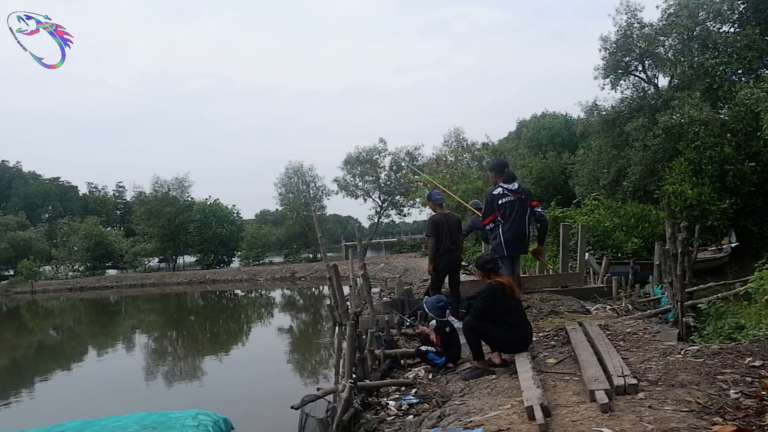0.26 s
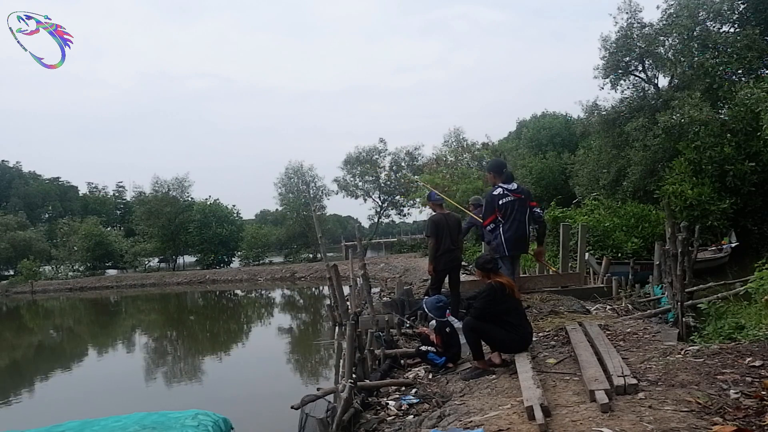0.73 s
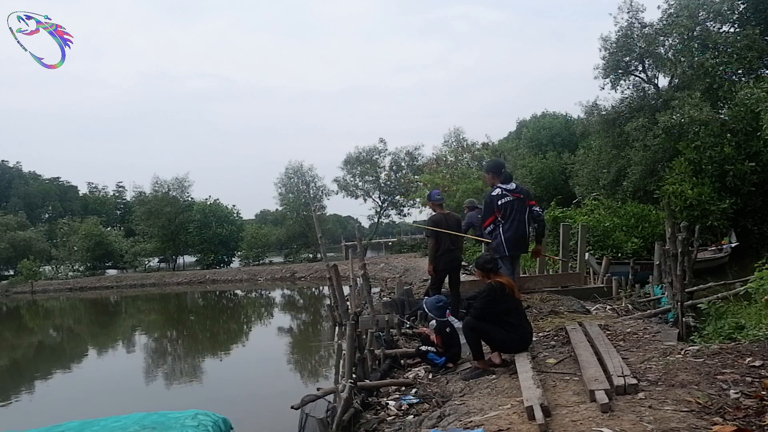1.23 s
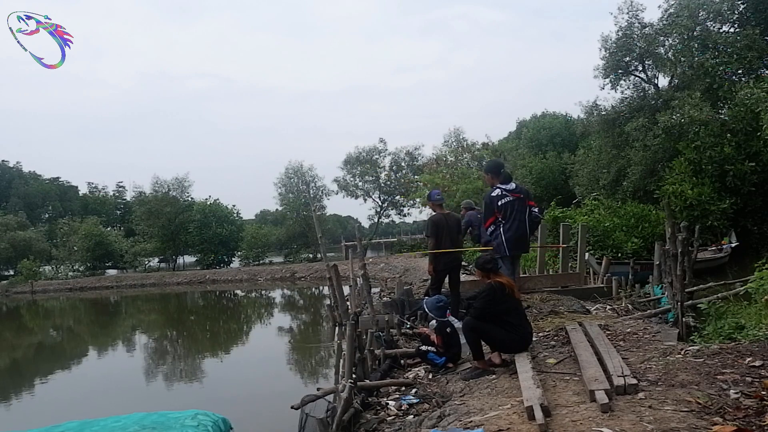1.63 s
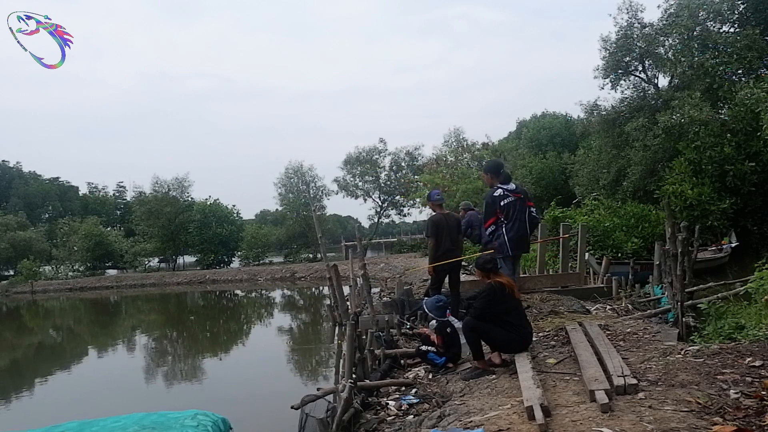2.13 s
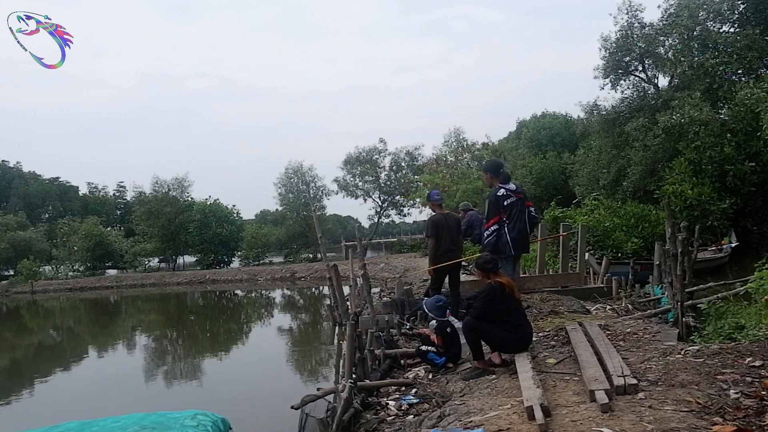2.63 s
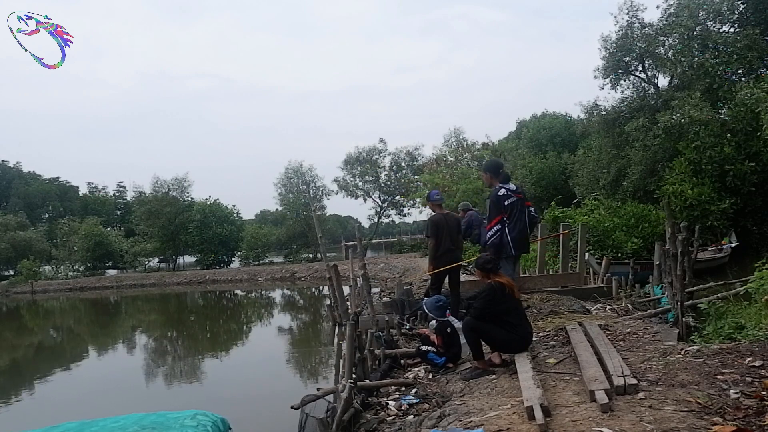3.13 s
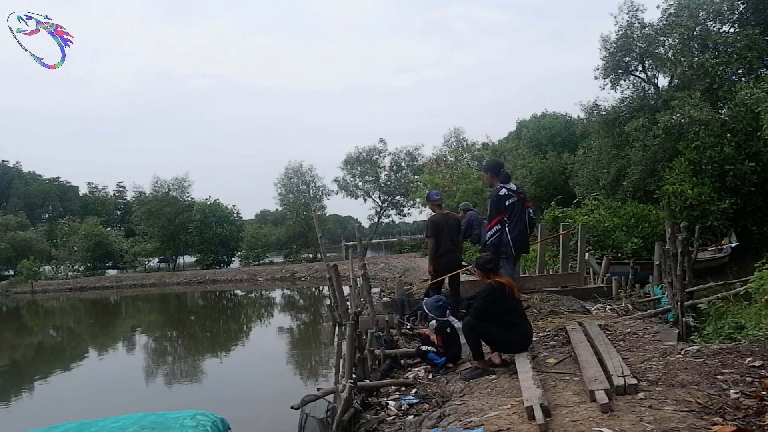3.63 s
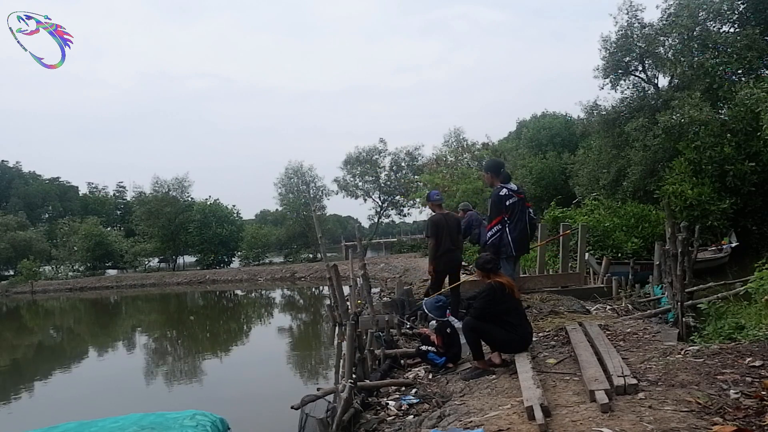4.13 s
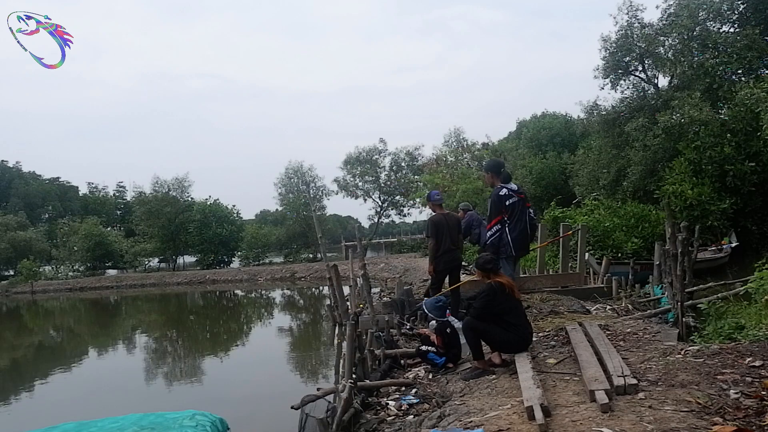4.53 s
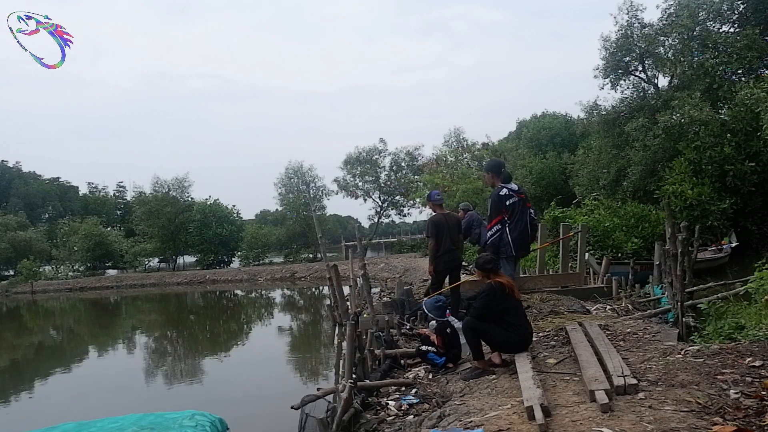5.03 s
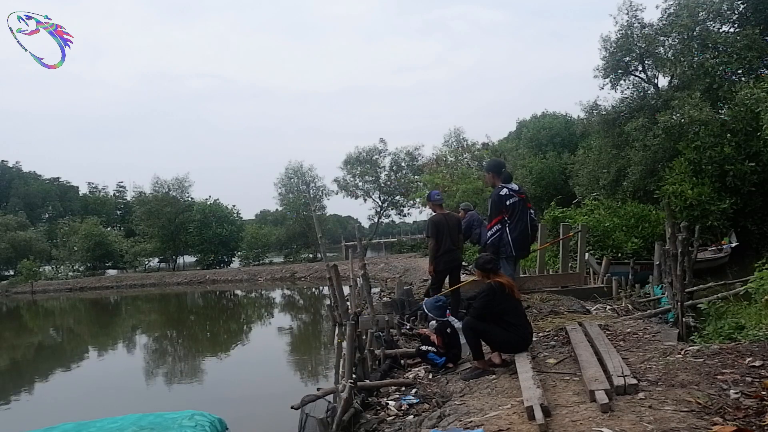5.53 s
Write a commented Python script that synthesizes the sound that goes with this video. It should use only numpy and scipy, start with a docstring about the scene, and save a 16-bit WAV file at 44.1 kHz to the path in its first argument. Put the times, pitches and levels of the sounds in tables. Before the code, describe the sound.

Outdoors by a tree-lined pond, gusts rumble and thump on an unprotected stereo microphone, strongest in the first two seconds and again around three. Two high crickets pulse in overlapping bouts toward the right. A small bird gives a quick falling chirp about every half second, over soft leaf hiss and a faint far engine. A few tiny twig ticks come early.

```python
"""A pond bank on a breezy day. Gusts rumble and thump on the microphone: turbulence noise and single pressure bumps.
Behind them lie the filtered-noise wash of open air and leaves and the steady harmonics of a far engine.
Two crickets sing in overlapping bouts of paired wing strokes; behind them noise bands rise with their bouts,
a chorus deep in the bushes and the blurred wash of the nearer cricket's strokes.
A small bird repeats one falling chirp, a swept tone which the trees scatter; twigs tick as short noise bursts."""
import sys
import numpy as np
from scipy import signal
from scipy.fft import rfft, irfft
from scipy.io import wavfile
from scipy.ndimage import uniform_filter1d

SR = 44100
rng = np.random.default_rng(int(sys.argv[2]) if len(sys.argv) > 2 else 0)


def inscribe(sig):
    """Save sig as 16-bit PCM at rate SR to the path in sys.argv[1].

    A 1-D sig is mono; a 2-D sig holds one channel per row.
    Samples are clipped to [-1, 1] before scaling.
    """
    pcm = np.round(np.clip(np.atleast_2d(sig).T, -1, 1) * 32767)
    wavfile.write(sys.argv[1], SR, pcm.astype(np.int16))


N = 254456
T = np.arange(N) / SR  # time of every sample, s


def gain_of(db):
    """Decibels to amplitude."""
    return 10 ** (np.asarray(db) / 20)


def evened(x):
    """Scales to rms 1."""
    return x / np.sqrt(np.mean(x ** 2) + 1e-20)


def curve(rows):
    """A table of (s, value) read at every sample, with straight lines between the rows."""
    return np.interp(T, *np.transpose(rows))


def placed(x, pan_db):
    """Sets a sound left (positive) or right (negative) by level."""
    return x * gain_of([[pan_db / 2], [-pan_db / 2]])


def add(mix, s, sound):
    """Mixes a sound in at time s, trimmed to what fits."""
    start = round(s * SR)
    sound = sound[..., max(-start, 0):]
    part = mix[..., max(start, 0):][..., :sound.shape[-1]]
    part += sound[..., :part.shape[-1]]


def drift(hz):
    """Slow chance of rms 1, up to about hz."""
    f = np.fft.rfftfreq(N, 1 / SR)
    spectrum = rfft(rng.standard_normal(N)) * np.exp(-(f / hz) ** 2)
    return evened(irfft(spectrum, N))


def tone(pitch_hz):
    """A sine that follows a pitch given sample by sample."""
    return np.sin(2 * np.pi * np.cumsum(pitch_hz) / SR)


def noise(spectrum, alike):
    """Two channels of coloured noise of rms 1 that share a part of their power."""
    f = np.fft.rfftfreq(N, 1 / SR)
    hz, db = np.transpose(spectrum)
    white = rng.standard_normal((3, N))
    pair = np.sqrt(alike) * white[0] + np.sqrt(1 - alike) * white[1:]
    colour = gain_of(np.interp(np.log(f + 1), np.log(hz), db))
    return evened(irfft(rfft(pair) * colour, N))


def trees(x, early_s, late_s, late_db):
    """Scatter from near foliage, then a weak long tail from the far bank, as sparse random echoes."""
    t = T[:SR]
    taps = rng.standard_normal((2, SR)) * (rng.random((2, SR)) < .1)
    tail = taps * (np.exp(-t / early_s) + gain_of(late_db) * np.exp(-t / late_s))
    tail /= np.linalg.norm(tail, axis=1, keepdims=True)
    return signal.fftconvolve(x[None], tail, axes=1)[:, :N]


def engine(rise_db):
    """Far engine: harmonics of an unsteady firing rate, each following part of the murmur's rise."""
    # harmonics: multiple of the firing rate, level_db, share of the murmur's rise
    harmonics = [(4, -62, 0.1), (5, -68, 0.61), (6, -70, 0.57), (7, -66.5, 1), (18, -74.5, 0.61)]
    out = np.zeros((2, N))
    firing_hz = 74.85
    turns = np.cumsum(firing_hz * (1 + 0.00411 * drift(hz=5.54))) / SR
    for order, db, share in harmonics:
        # moving air makes a far tone come and go, quicker on the left
        fading_db = 3 * np.array([drift(hz=15.0), drift(hz=2.5)])
        wave = np.sin(2 * np.pi * (round(order) * turns + rng.random()))
        out += gain_of(db + fading_db + share * rise_db) * wave
    return out


def landscape():
    """Far murmur and engine, heard louder while the wind on the microphone is low; leaves hiss and rustle."""
    # colour of the far murmur: frequency_hz, relative density_db per Hz
    air = [(18, -44), (30, -12.5), (148, 3.5), (215, 0), (279, -4.5), (424, -12.5), (528, -8), (979, -14),
           (3040, -27), (3500, -24.5), (4550, -24), (7700, -120)]
    # loudness of the far murmur: time_s, relative level_db
    air_level = [(0, -58.5), (1.75, -59.5), (2.15, -53.5), (2.7, -59.5), (4.05, -59.5), (4.3, -55.5),
                 (5.77, -55.0)]
    # colour of the steady leaf hiss: frequency_hz, relative density_db per Hz
    hiss = [(300, -43), (1000, 0.5), (2000, 2), (3500, -1), (4200, 3), (5500, 0), (7000, -0.5), (10000, -3),
            (13000, -4), (15800, -6)]
    level_db = curve(air_level)
    far = noise(air, alike=0.18) * gain_of(level_db + 7.0 + 0.72 * drift(hz=25))
    far += engine(level_db - level_db.mean())
    leaves = noise(hiss, alike=0.065) * gain_of(-53 + 0.62 * drift(hz=18))
    rustle = noise([(1200, -23), (2600, 3), (3300, 1.5), (6000, -16.0)], alike=0.077)
    rustle *= gain_of(-70.5 + 5.0 * drift(hz=19))
    return placed(far, pan_db=-1.0) + leaves + rustle


def twigs():
    """Tiny dry snaps: a decaying burst of noise in one broad resonance."""
    # ticks: start_s, starting level_db, pitch_hz, decay_s to 1/e
    ticks = [(.44, -45, 12500, 0.0025), (.445, -54, 12000, 0.055), (1.28, -49, 10000, .002),
             (1.448, -39, 9500, 0.0034)]
    out, t = np.zeros((2, N)), T[:SR // 5]
    for s, db, hz, decay_s in ticks:
        ring = signal.iirpeak(hz, 2.2, fs=SR)
        burst = signal.filtfilt(*ring, rng.standard_normal((2, len(t))), padtype=None)
        add(out, s, gain_of(db) * evened(burst) * np.exp(-t / decay_s))
    return out


def birds():
    """A chirp hangs at its top, then slides down to its end note; far birds waver around one pitch."""
    # near chirps: start_s, length_s, starting pitch_hz, relative level_db, direct share_db at the chirp's end
    chirps = [(0.196, 0.046, 5140, -44.5, 2.5), (.742, 0.053, 4990, -45, 1),
              (1.375, 0.058, 5280, -42.5, 1.5), (1.925, 0.051, 5380, -43, -3),
              (2.532, 0.054, 5050, -45.5, 2), (3.05, 0.054, 5210, -42, 0.5), (3.659, .054, 5120, -42.5, -4),
              (4.189, 0.061, 5220, -41, -1.5), (4.701, 0.074, 5280, -39, -3),
              (5.287, 0.07, 5190, -38.5, -7)]
    # faint whistles of farther birds: start_s, length_s, pitch_hz, relative level_db
    whistles = [(.6, .08, 2920, -58), (2.335, .05, 5080, -55), (3.2, 0.068, 4840, -56),
                (3.84, 0.027, 3000, -53), (4.43, 0.089, 5220, -55.5), (5.099, 0.071, 4930, -53.5)]
    chirp_end_hz = 3967  # every chirp heads for this note
    beam_db = 7  # the direct sound gains this much over the course of a chirp
    near, direct, far = np.zeros((3, N))
    tremble = drift(hz=121)
    for s, length_s, hz, db, aim_db in chirps:
        u = np.linspace(0, 1, int(length_s * SR))
        waver = tremble[int(s * SR):][:len(u)]
        pitch_hz = (hz + (chirp_end_hz - hz) * u ** 1.35) * (1 + 0.011 * waver)
        level_db = db - 4.5 + 3.6 * (u - 1) + 1.2 * waver
        swell = np.sin(np.pi * u).clip(0) ** 0.27 * gain_of(level_db)
        chirp = swell * tone(pitch_hz)
        add(near, s, chirp)
        add(direct, s, gain_of(aim_db + beam_db * (u - 1)) * chirp)
    for s, length_s, hz, db in whistles:
        pitch_hz = hz * (1 + 0.02 * tremble[int(s * SR):][:int(length_s * SR)])
        add(far, s, gain_of(db) * np.hanning(len(pitch_hz)) * tone(pitch_hz))
    # the leaves around the bird blur the sweep; the trees along the bank ring on
    perch = trees(gain_of(2) * near + gain_of(-3) * far, early_s=.029, late_s=.08, late_db=-13)
    bank = trees(gain_of(0.5) * near + far, early_s=0.069, late_s=0.18, late_db=-17)
    return placed(direct + perch, pan_db=3.0) + placed(bank, pan_db=2.5)


def cricket(bouts, hz, fall, stroke_s, gap_s, first_db):
    """A chirp is a light wing stroke and then a strong one; each starts sharp and falls past the wing's note."""
    out, u = np.zeros(N), np.linspace(0, 1, int(stroke_s * SR))
    glide = fall * (np.exp(-u / 0.19) - 0.47 * u)
    for start, end, rate, db in bouts:
        for s in np.arange(start, end, 1 / rate):
            for lead_s, stroke_db in ((gap_s, first_db), (0, 0)):
                late, louder, higher = rng.standard_normal(3)  # no two strokes are quite alike
                stroke = np.sin(np.pi * u) * tone(hz * (1 + 0.0013 * higher + glide))
                stroke_start = s - lead_s - stroke_s / 2 + 0.00065 * late
                add(out, stroke_start, gain_of(db + stroke_db + 0.51 * louder) * stroke)
    return out


def singing(bouts):
    """Near 1 during a bout and 0 between bouts, with soft edges."""
    on = sum(((T > start) & (T < end)) * 1. for start, end, _, _ in bouts)
    edge_s = 0.13  # length of each soft edge
    return uniform_filter1d(on, int(edge_s * SR))


def crickets():
    """Two singers in the bushes on the right, their scatter, and two noise bands that rise with their bouts."""
    # bouts of the nearer cricket: first chirp_s, end_s, chirps per s, relative level_db
    near_bouts = [(-.023, .54, 15.0, -39), (.886, 1.37, 15.14, -39), (1.76, 2.25, 15.14, -39),
                  (2.894, 3.39, 15.18, -39), (3.976, 4.34, 15.32, -40), (4.89, 5.32, 15.16, -41),
                  (5.715, 5.8, 15.1, -40)]
    # bouts of its lower-pitched neighbour: first chirp_s, end_s, chirps per s, relative level_db
    low_bouts = [(-.023, .68, 15.0, -42.5), (.951, 1.63, 15.04, -43), (2.0, 2.68, 15.2, -43),
                 (3.086, 3.79, 14.84, -43), (4.152, 4.92, 15.3, -42.5), (5.15, 5.8, 14.9, -42)]
    # crickets deep in the bushes: frequency_hz, relative density_db per Hz
    chorus_colour = [(7200, -44), (7550, -19), (7700, -7.5), (7800, -4), (7865, -3), (7920, -14), (8030, 2),
                     (8120, -2), (8230, 0.5), (8380, -2.5), (8470, -7), (8560, -7), (8700, -17),
                     (8900, -30)]
    # blurred wash of the nearer cricket's strokes, scattered by the bushes:
    # frequency_hz, relative density_db per Hz
    wash_colour = [(7900, -56), (8150, 3), (8370, 6), (8460, -3), (8540, -2), (8620, -4), (8720, -17),
                   (9000, -70)]
    near = cricket(near_bouts, hz=8300, fall=.011, stroke_s=.0155, gap_s=.0225, first_db=-2)
    low = cricket(low_bouts, hz=7955, fall=.009, stroke_s=.019, gap_s=.022, first_db=-1)
    low *= gain_of(-1.5)
    direct = placed(near + low, pan_db=-7)
    direct[0] *= -1  # so short a wave reaches the two ports in opposite phase
    scatter = trees(gain_of(-8) * near + low, early_s=.03, late_s=.1, late_db=-8)
    # resting level, then the rise during a bout
    chorus_db = -54.5 + 1 * singing(low_bouts) + 1.46 * drift(hz=40)
    wash_db = -74.25 + 12.5 * singing(near_bouts) + 1.7 * drift(hz=40)
    chorus = noise(chorus_colour, alike=0) * gain_of(chorus_db)
    wash = noise(wash_colour, alike=0) * gain_of(wash_db)
    return direct + placed(scatter + chorus + wash, pan_db=-5.5)


def wind():
    """Lumpy turbulence: strong gusts press on both ports together, light air more on each alone."""
    # colour of strong gusts on the microphone: frequency_hz, relative density_db per Hz
    buffet = [(12, -18), (20, -17), (51, -1.5), (74, 1.5), (118, -9), (161, -2.5), (269, -21), (296, -27.5),
              (329, -31), (377, -27.5), (403, -31.5), (500, -47.5), (650, -63), (1100, -120)]
    # colour of light air tugging at each port: frequency_hz, relative density_db per Hz
    flutter = [(20, -26), (45, 0.5), (63, 5), (85, -6.5), (120, -6.5), (165, 1), (210, -5), (280, -10),
               (400, -20), (650, -26), (1100, -80)]
    # the breeze on the microphone, with its lulls: time_s, relative level_db
    breeze = [(0, -42), (0.55, -38.5), (1.15, -37.0), (1.33, -40.5), (1.5, -35.5), (1.75, -38.0),
              (2.0, -45), (2.5, -46.5), (2.63, -36.5), (2.95, -37.5), (3.55, -40.5), (3.78, -35.5),
              (4.12, -40.5), (4.35, -47), (4.98, -48.5), (5.33, -42), (5.77, -48.5)]
    # short gusts that ride on it: centre_s, length_s, peak rise_db above the breeze
    gusts = [(0.092, 0.051, 11), (0.177, 0.057, 9.5), (.4, .1, 5.5), (.59, 0.13, 6), (0.837, 0.042, 6),
             (0.958, .08, 3.5), (1.104, 0.079, 6), (1.682, 0.056, 5), (2.91, 0.1, 4.5), (3.133, 0.051, 4),
             (3.303, 0.058, 7), (3.418, 0.067, 5)]
    level_db = curve(breeze)
    for s, length_s, rise_db in gusts:
        level_db = level_db + rise_db * np.exp(-(2 * (T - s) / length_s) ** 2)
    strong = np.clip((level_db + 43.5) / 5, 0, 1)
    flow = np.sqrt(strong) * noise(buffet, alike=0.52)
    flow += np.sqrt(1 - strong) * noise(flutter, alike=0.22)
    return flow * gain_of(level_db - 0.4 - 1.8 * (1 - strong) + 1.7 * drift(hz=22.5))


def eddy(hz):
    """One bump of pressure between two shallow dips; it rises faster than it falls."""
    cycles = hz * np.arange(-SR // 20, SR // 20) / SR
    u = (np.pi * cycles * (1 - 0.14 * np.tanh(3 * cycles))) ** 2
    return (1 - 2 * u) / (1 + u / 4) ** 5


def eddies():
    """Each eddy strikes the ports unevenly and travels among four smaller, mostly quicker ones."""
    # single eddies that strike the ports: centre_s, louder side's peak level_db, pitch_hz, left-right pan_db
    strikes = [(.086, -20.5, 70, 3), (0.527, -21, 70, 1), (.748, -26.5, 68.6, 5), (1.089, -13.5, 152, -6.5),
               (1.185, -25.5, 134, -2), (1.873, -28, 160, 0), (1.905, -21, 235, 19),
               (1.939, -21.5, 230, -26), (2.006, -28, 190, 28), (2.018, -23, 307, -17),
               (2.228, -23, 230, 17), (2.253, -25.5, 197.5, -10), (2.266, -20.5, 214, -19),
               (3.519, -24.5, 83, -2), (3.849, -32.5, 238, -7), (4.085, -33.5, 260, -6),
               (4.108, -29, 238, -17), (4.13, -17.5, 249, -22), (4.157, -28.5, 238, -23),
               (5.042, -25.5, 167, -20), (5.275, -34.5, 158, -6), (5.338, -29, 150, 11),
               (5.52, -30.5, 208, -13)]
    out = np.zeros((2, N))
    for s, db, hz, pan_db in strikes:
        start = s - 1 / 20  # the bump peaks 1/20 s into its sound
        peak_db = db - abs(pan_db) / 2
        add(out, start, placed(gain_of(peak_db) * eddy(hz), pan_db))
        for late, louder, quicker, side in rng.standard_normal(size=(4, 4)):
            small = eddy(hz * 1.37 * np.exp(0.2 * quicker))
            small *= np.sign(side) * gain_of(peak_db - 13.5 + 1.7 * louder)
            add(out, start + 0.016 * late, placed(small, pan_db + 4 * side))
    return out


def scene():
    """Everything heard from the bank."""
    return landscape() + twigs() + birds() + crickets() + wind() + eddies()


def record(dry):
    """The microphone sheds the deepest rumble; then a steep low-pass sets the band limit."""
    rumble_cut = signal.butter(2, 28, "highpass", fs=SR, output="sos")
    thinned = signal.sosfilt(rumble_cut, dry)
    band_limit = signal.firwin(511, 15800, window=("kaiser", 9), fs=SR)
    return signal.oaconvolve(thinned, band_limit[None], "same")


dry = scene()
out = record(dry)
inscribe(out)
```